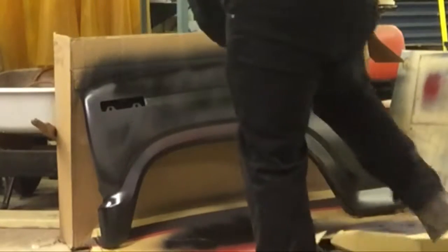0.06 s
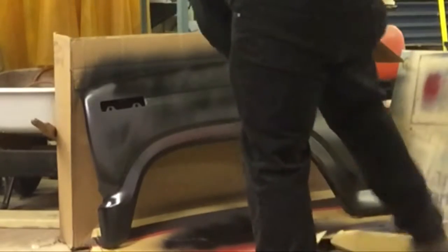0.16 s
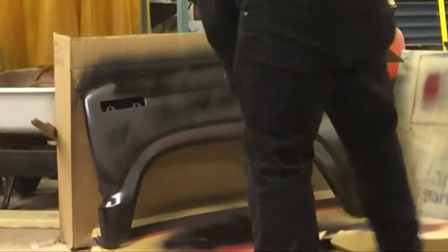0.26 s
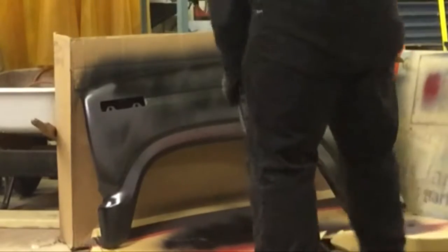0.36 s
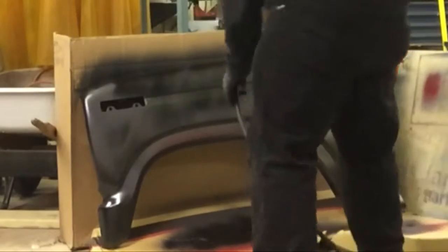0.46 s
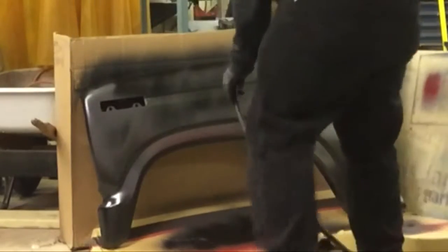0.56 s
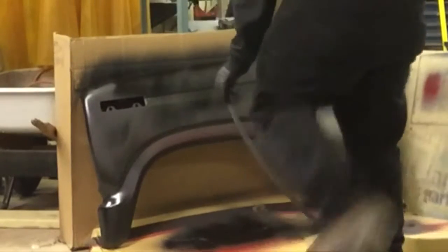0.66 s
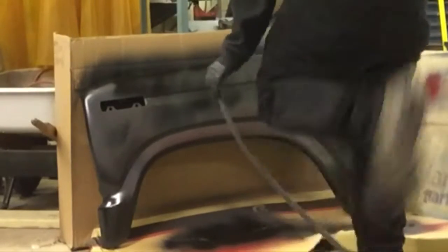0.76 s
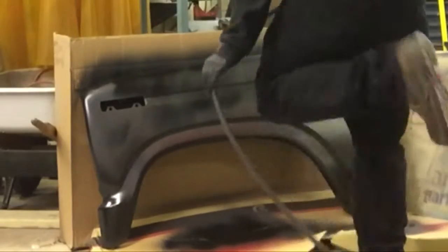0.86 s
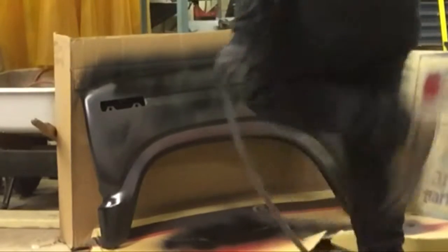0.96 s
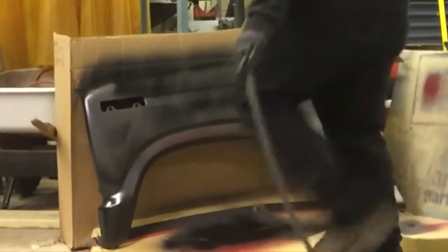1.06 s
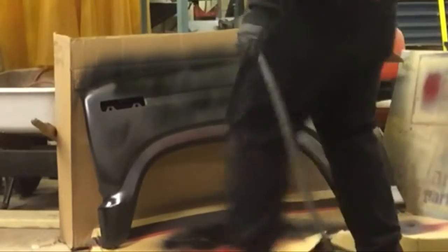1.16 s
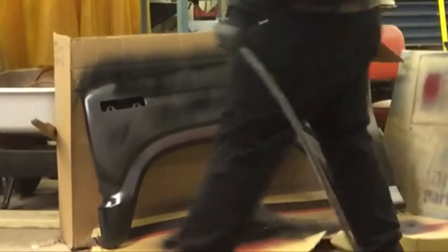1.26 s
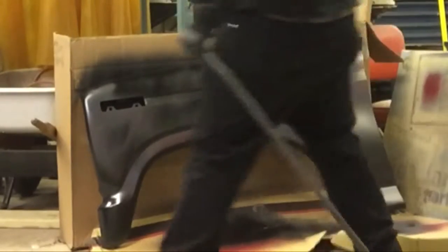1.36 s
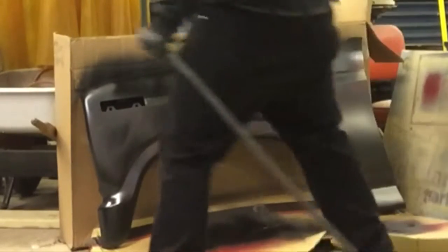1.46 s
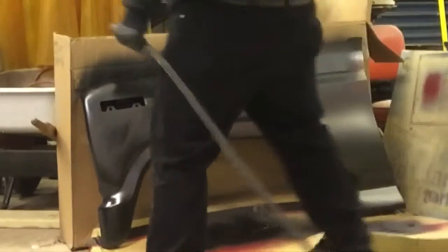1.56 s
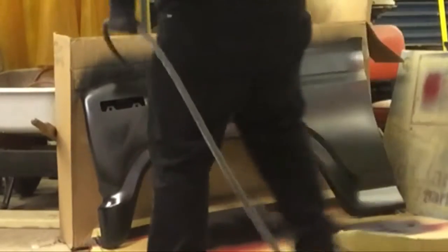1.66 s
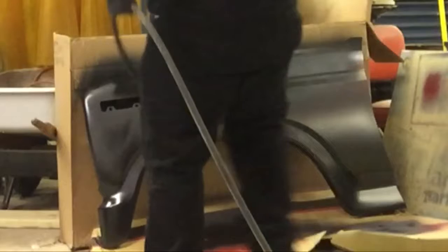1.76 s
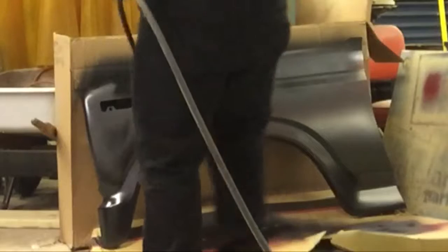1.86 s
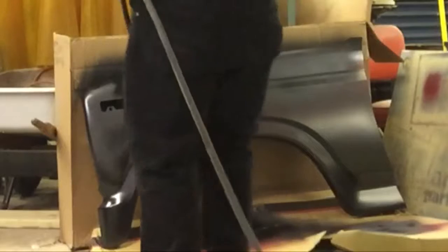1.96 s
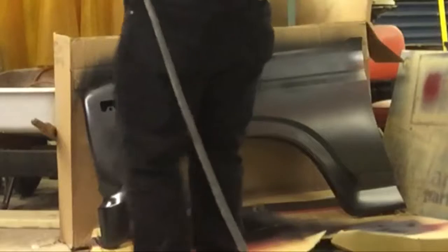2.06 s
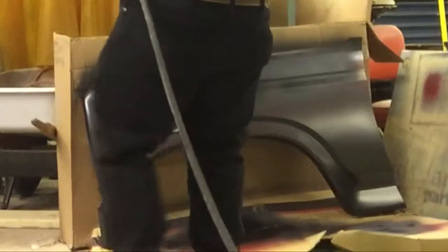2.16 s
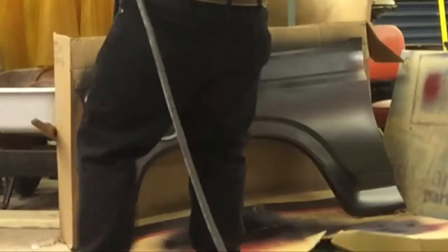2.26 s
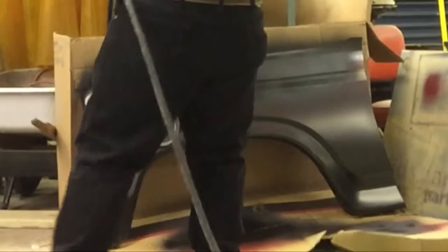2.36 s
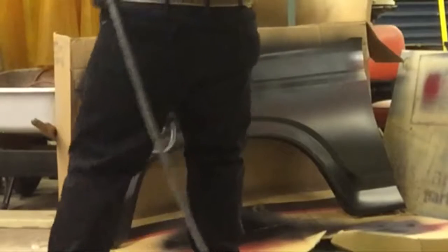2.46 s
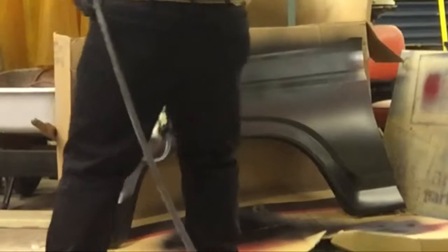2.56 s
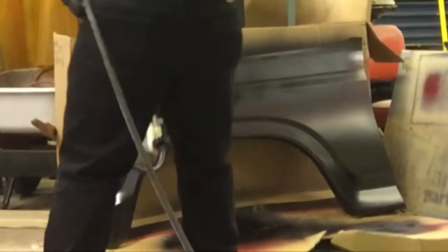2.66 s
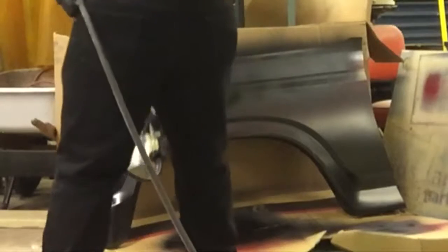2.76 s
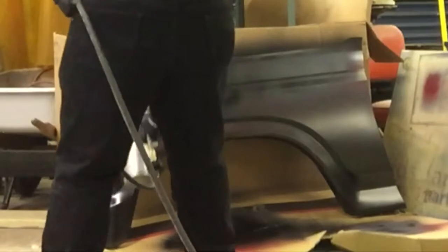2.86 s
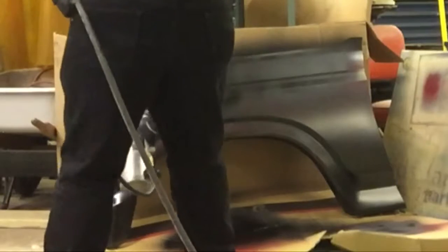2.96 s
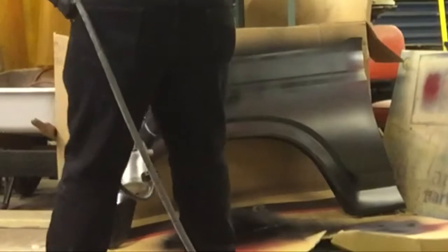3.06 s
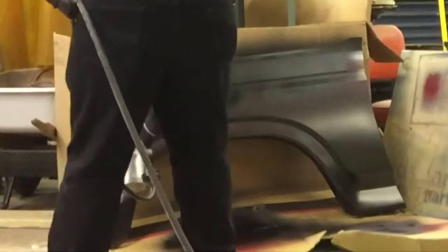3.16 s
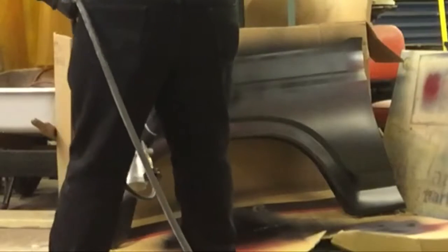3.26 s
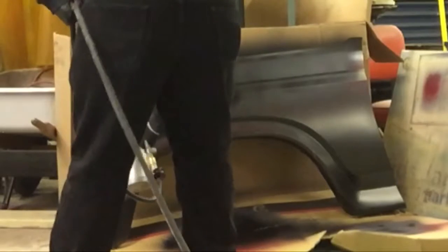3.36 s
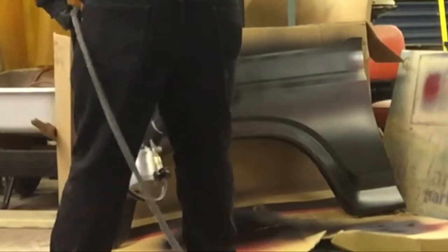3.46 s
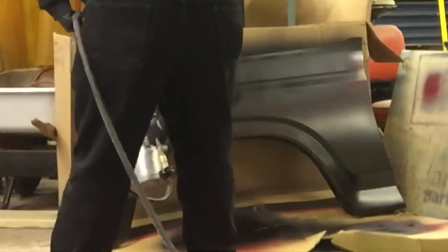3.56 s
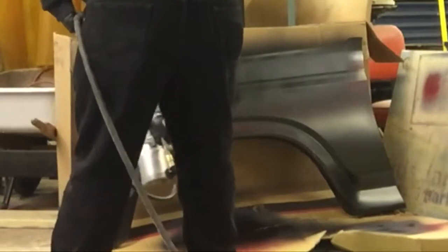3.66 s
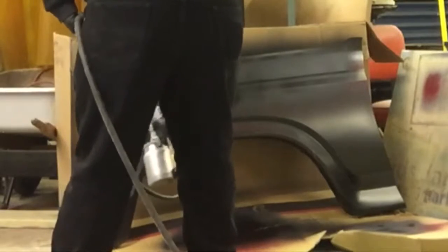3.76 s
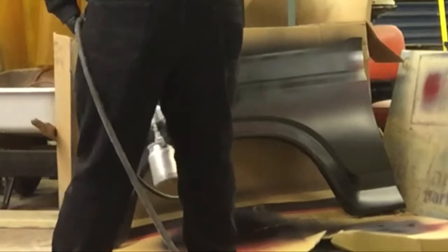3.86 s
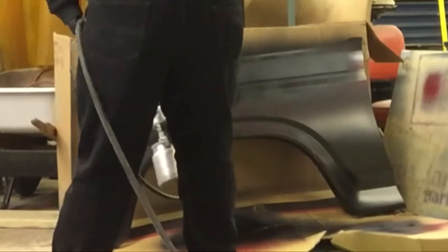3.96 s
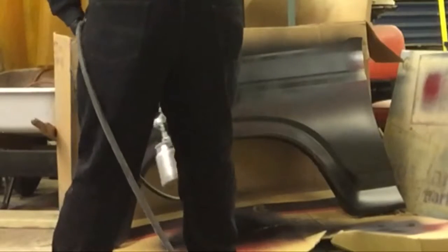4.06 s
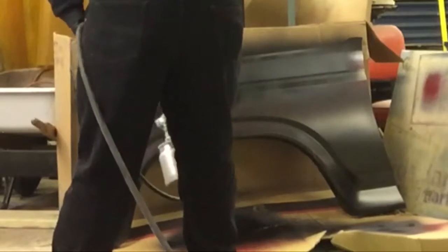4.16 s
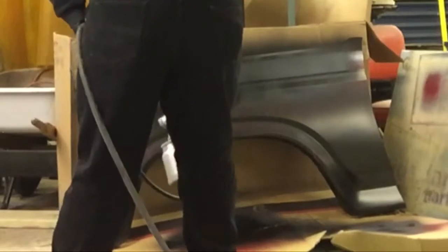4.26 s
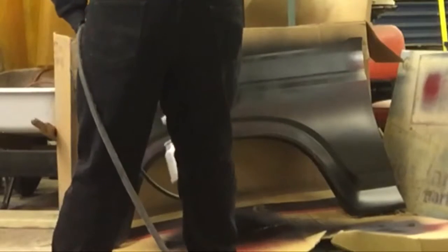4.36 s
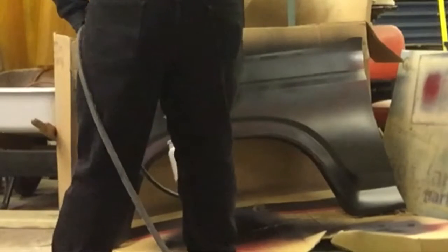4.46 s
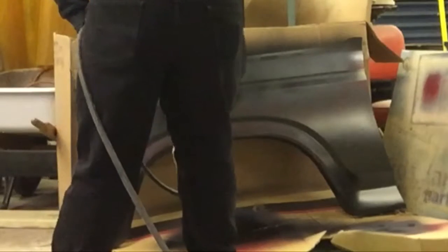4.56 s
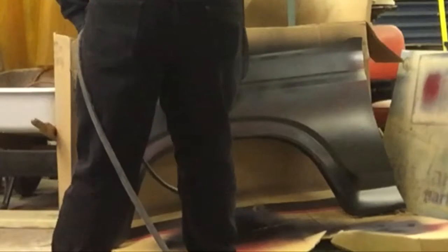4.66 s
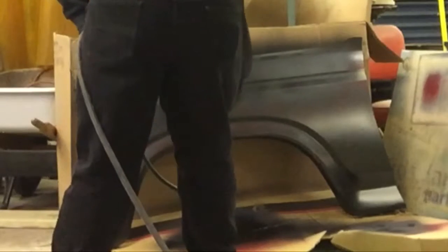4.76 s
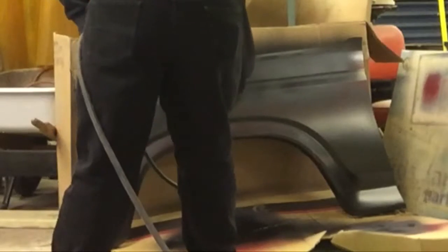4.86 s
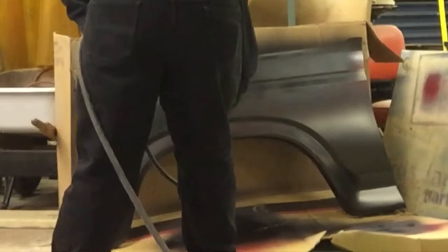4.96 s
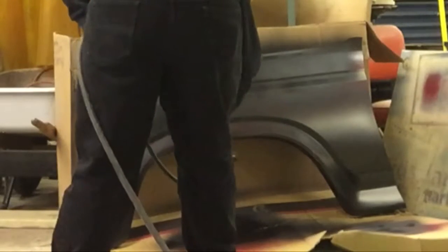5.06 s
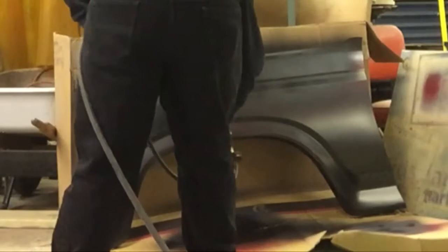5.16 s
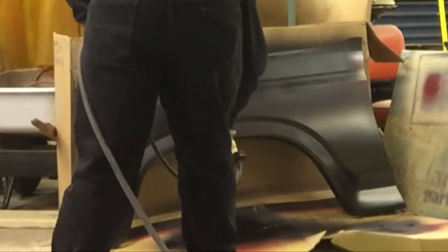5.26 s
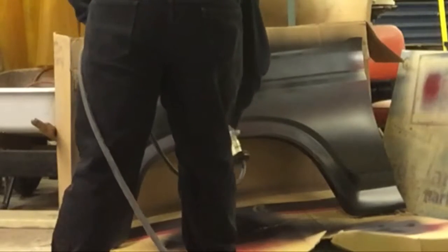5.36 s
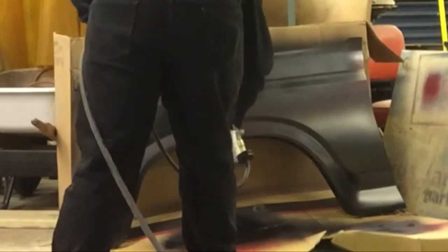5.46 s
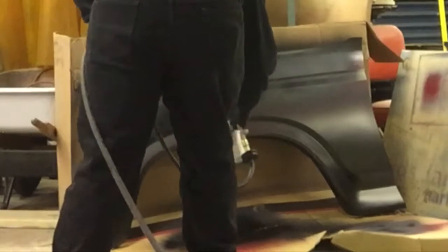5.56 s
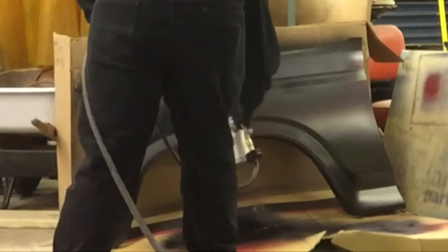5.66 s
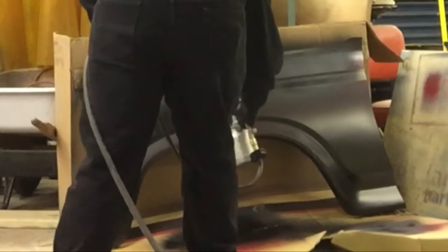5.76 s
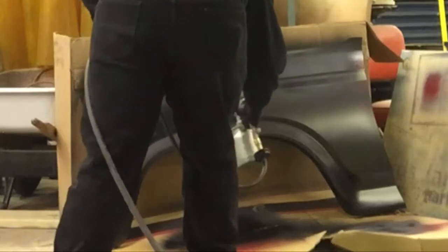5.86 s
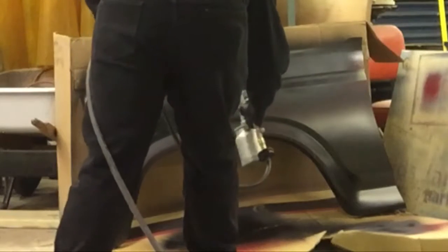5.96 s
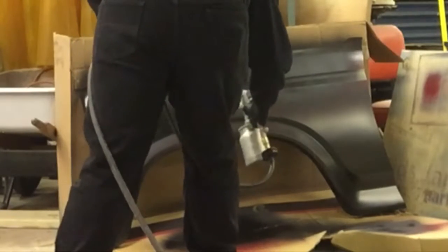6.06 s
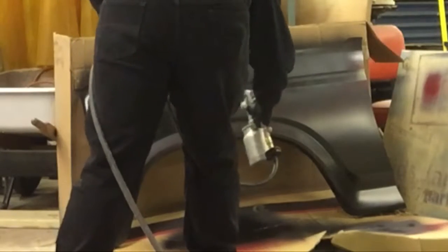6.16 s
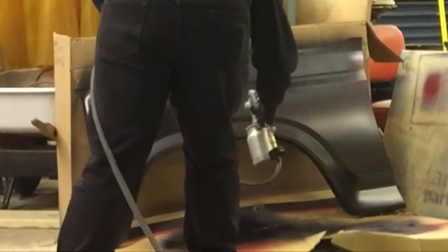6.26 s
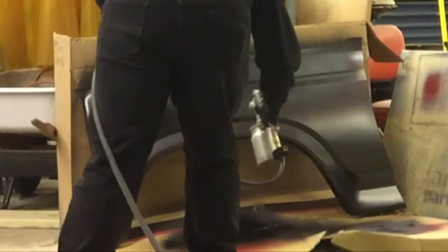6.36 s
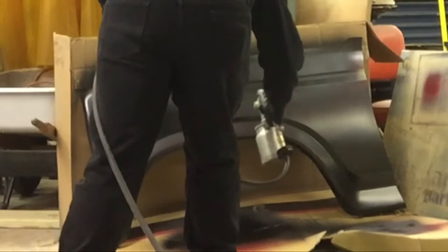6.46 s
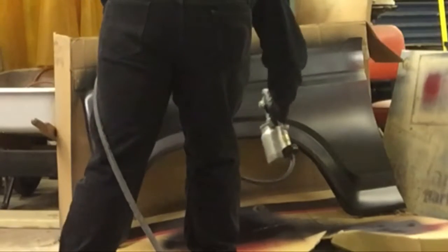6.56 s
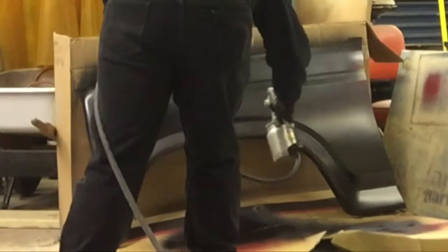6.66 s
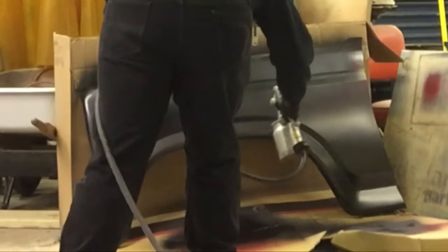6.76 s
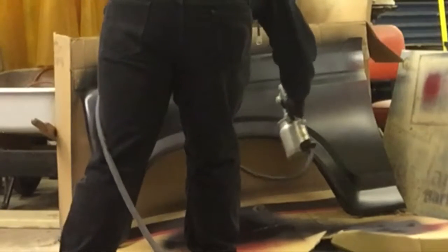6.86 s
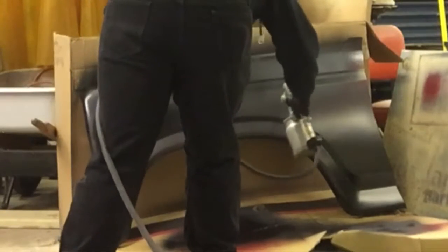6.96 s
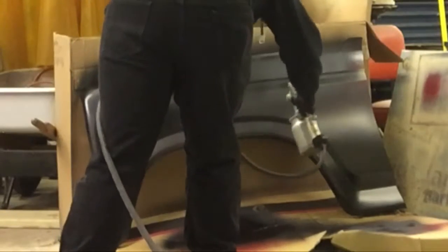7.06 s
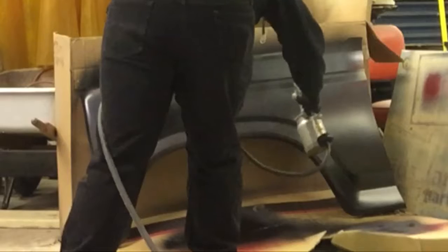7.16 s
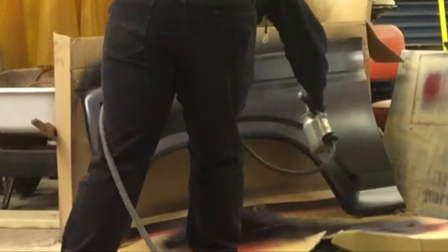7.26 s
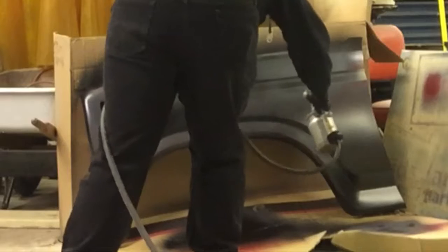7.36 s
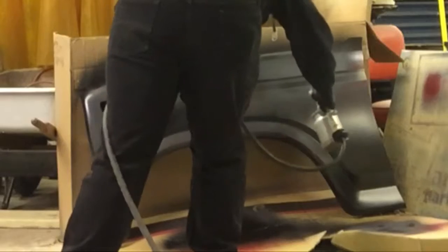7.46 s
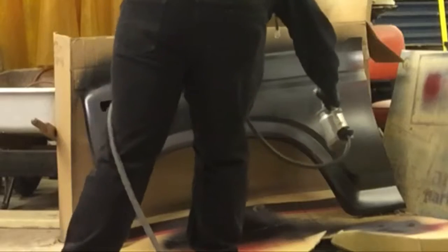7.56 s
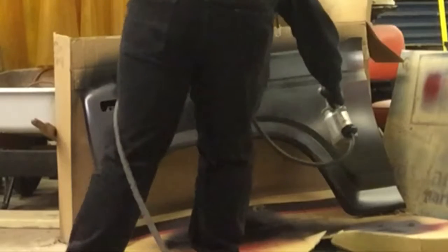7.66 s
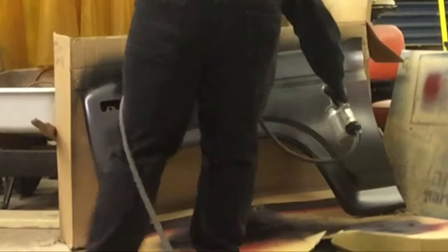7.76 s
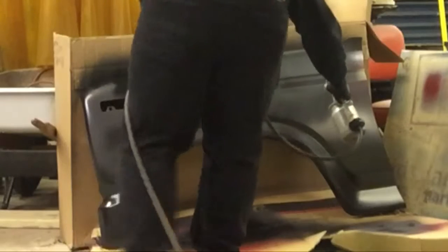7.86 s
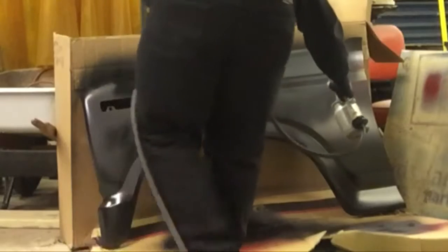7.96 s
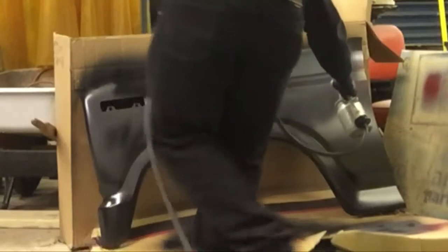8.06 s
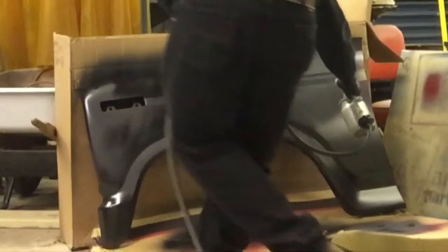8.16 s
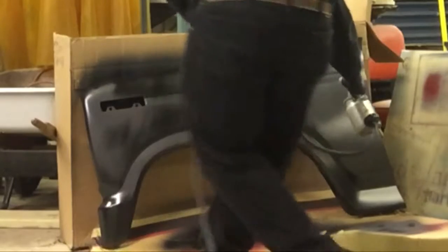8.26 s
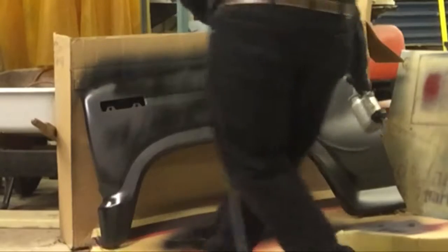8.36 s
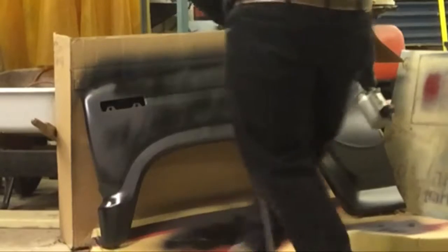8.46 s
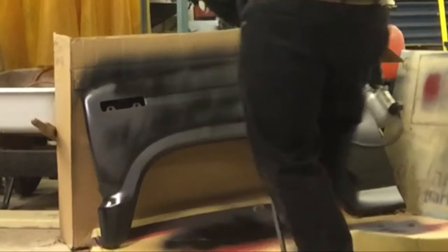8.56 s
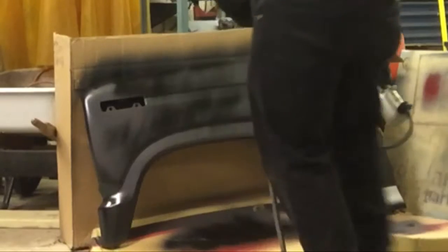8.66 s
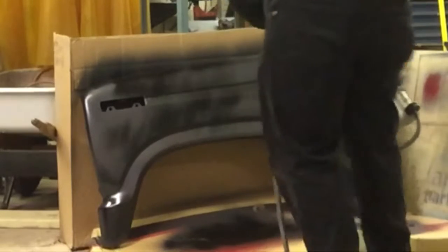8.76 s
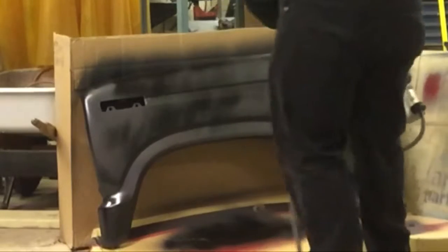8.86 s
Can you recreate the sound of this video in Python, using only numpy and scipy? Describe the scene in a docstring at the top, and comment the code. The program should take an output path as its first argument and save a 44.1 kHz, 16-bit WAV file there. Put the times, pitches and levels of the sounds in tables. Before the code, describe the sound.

Over a wavering deep motor hum, faint fabric and hose rubbing gives way to a long, sharp, continuous hiss of compressed air.

```python
"""A piston compressor thrums in a workshop, with a wavering motor hum, a low rumble and a faint air hiss.
A painter steps up to a car wing, clothes and air hose rustling, then pulls the trigger of a spray gun.
The air jet starts with a short surge and hisses on, its colour shifting as the gun sweeps along the panel.
The compressor and motor are rows of tones; the rustling, rumble and air are shaped noise.
One microphone hears it all, in mono."""
import sys
import numpy as np
from scipy import signal
from scipy.fft import rfft, irfft
from scipy.io import wavfile

SR = 44100
rng = np.random.default_rng(int(sys.argv[2]) if len(sys.argv) > 2 else 0)


def master_out(mix):
    """Clip the mix to full scale and print it as 16-bit PCM to the path in sys.argv[1]."""
    frames = np.transpose(np.atleast_2d(mix))
    ceiling = np.clip(frames, -1, 1)
    pcm = np.round(ceiling * 32767).astype(np.int16)
    wavfile.write(sys.argv[1], SR, pcm)


N = 392490  # length in samples
TIME = np.arange(N) / SR  # seconds
FREQS = np.fft.rfftfreq(N, 1 / SR)  # Hz


def undb(db):
    """Turn decibels into a gain."""
    return 10 ** (np.asarray(db) / 20)


def unit(x):
    """Scale a sound to an rms (average strength) of 1."""
    return x / np.sqrt(np.mean(x ** 2))


def curves(table):
    """Draw straight lines through each column of a time table, giving one value a sample."""
    times_s, *columns = np.transpose(table)
    return [np.interp(TIME, times_s, column) for column in columns]


def gain_at(spectrum, hz):
    """Read the gain of a (pitch_hz, level_db) table, with pitch on a logarithmic axis."""
    points_hz, level_db = np.transpose(spectrum)
    return undb(np.interp(np.log(hz + 1), np.log(points_hz), level_db))


def bumps(table):
    """Gain of a row of smooth peaks and dips, each (pitch_hz, width_hz, level_db)."""
    total_db = sum(db * np.exp(-((FREQS - hz) / width_hz) ** 2) for hz, width_hz, db in table)
    return undb(total_db)


def colour(x, gain):
    """Filter a sound with one gain for each frequency."""
    return irfft(rfft(x) * gain, N)


def noise(spectrum):
    """Make noise with the given dB per Hz at each pitch."""
    return colour(rng.standard_normal(N), gain_at(spectrum, FREQS)) * np.sqrt(SR / 2)


def walk(rate_hz):
    """Smooth random wandering with rms 1; changes faster than about rate_hz fade out."""
    return unit(colour(rng.standard_normal(N), np.exp(-(FREQS / rate_hz) ** 2)))


def room(x, t60, wet_db):
    """Add diffuse workshop reflections, which fall by 60 dB in t60 seconds."""
    t = TIME[:SR // 2]
    fade = np.exp(-np.log(1000) * t / t60)
    tail = rng.standard_normal(len(t)) * fade * (t > .006)  # reflections start after 6 ms
    tail = tail / np.linalg.norm(tail)
    return x + undb(wet_db) * signal.fftconvolve(x, tail)[:N]


def workshop(rumble_db=1, ease_db_per_s=0.18, air_db=0, waver_db=0.1, rumble_top_hz=3500,
             swell_db=2.0, swell_at_s=1.75, swell_s=0.38):
    """Low rumble that wavers, swells once, briefly, and slowly eases, under a smooth air hiss."""
    # workshop rumble before the level changes below: pitch_hz, level_db (per Hz)
    rumble_colour = [(30, -73), (39, -75), (48, -53), (66, -51.5), (88, -52.5), (100, -57.5), (150, -56),
                     (175, -54), (200, -54), (225, -61.5), (265, -63), (295, -57), (330, -64), (400, -65),
                     (490, -74), (650, -71), (1500, -80.5), (3000, -86.5)]
    # steady faint air hiss: pitch_hz, level_db (per Hz)
    air_colour = [(800, -83.5), (1650, -80), (2250, -81), (2650, -79.5), (4000, -80), (4300, -78.5),
                  (4750, -78.5), (5150, -81.3), (6400, -81), (7200, -85), (8300, -85), (11000, -89),
                  (14000, -91.5), (16000, -120)]
    # peaks and hollows that the workshop gives to the rumble: pitch_hz, width_hz, level_db
    room_modes = [(48.5, 2, 2), (53, 2, -4), (68, 2, 4), (72.6, 2.5, -2), (83, 4, 1), (96, 4, 3),
                  (159, 3.5, -2.5), (293, 14, 1), (214, 5.5, -3), (820, 110, -2.5), (955, 27, -3)]
    treble_cut = 1 / (1 + (FREQS / rumble_top_hz) ** 4)
    rumble = colour(noise(rumble_colour), bumps(room_modes) * treble_cut)
    swell = np.exp(-((TIME - swell_at_s) / swell_s) ** 2)
    level_db = rumble_db - ease_db_per_s * TIME + swell_db * swell + waver_db * walk(3.5)
    return rumble * undb(level_db) + noise(air_colour) * undb(air_db)


def motor(motor_hz=59.5, trim_db=0.0, waver_hz=0.21, waver_db=0.7, waver_rate_hz=4,
          tones_db=0, drift_hz=0.29, flicker_db=1.0):
    """A deep hum that wavers in level and pitch, with fainter tones and a thin whine above it."""
    # level of the hum before its random waver: time_s, level_db (rms)
    hum_levels = [(0, -25.5), (1.23, -24.5), (1.52, -32), (1.76, -23.5), (1.92, -31), (2.05, -25.5),
                  (2.35, -24.5), (2.43, -30), (2.6, -25.5), (2.77, -27), (2.9, -23.5), (3.9, -27),
                  (4.35, -25.5), (4.88, -28.5), (5.01, -30), (5.1, -25.5), (5.8, -25), (6.5, -29.5),
                  (6.85, -33), (7.47, -26.5), (7.65, -31.5), (8.12, -23), (8.25, -29), (8.75, -25)]
    # fainter tones and thin whine before their flicker: pitch_hz, level_db (rms)
    faint_tones = [(74.5, -46), (89.4, -40.5), (149, -47), (184.5, -48), (942.1, -57.5)]
    level_db, = curves(hum_levels)
    turns = np.cumsum(motor_hz + waver_hz * walk(4.6)) / SR
    hum = np.sin(2 * np.pi * turns) * undb(level_db + trim_db + waver_db * walk(waver_rate_hz))
    for hz, db in faint_tones:
        turns = np.cumsum(hz + drift_hz * walk(1.8)) / SR
        hum = hum + np.sin(2 * np.pi * turns) * undb(db + tones_db + flicker_db * walk(3.3))
    return np.sqrt(2) * hum  # a sine's peak is root 2 times its rms


def compressor(crank_hz=12.961, thrum_db=0, clatter_db=0, scatter_db=1.5, speed_wander=0.0008,
               size=4096, count=190):
    """Every turn of the crank repeats the same knocks, smeared by the room into a dense row of tones."""
    # strong tones: multiple of the crank rate, level_db (rms)
    strong_tones = [(6, -38), (8, -41), (10, -36), (11, -43), (12, -44), (13, -38), (15, -48), (16, -50),
                    (17, -47), (18, -52), (19, -52), (20, -51), (22, -46.5), (23, -43), (25, -57),
                    (26, -48), (27, -45), (28, -50), (29, -52), (30, -53), (31, -49), (34, -57), (36, -55),
                    (38, -59), (47, -64), (52, -58), (61, -58.5), (64, -64), (67, -57), (68, -60),
                    (69, -63), (71, -57), (72, -61.5), (86, -63), (89, -63.5), (91, -62), (104, -62)]
    # the rest of the clatter, before random scatter: pitch_hz, level_db (rms of each multiple)
    clatter_colour = [(110, -57.5), (220, -50), (350, -65), (520, -66.5), (900, -69), (1300, -67),
                      (2000, -88)]
    orders = np.arange(4, count)  # multiples of the crank rate
    tones = np.zeros(size // 2 + 1)
    scatter = undb(clatter_db + scatter_db * rng.standard_normal(len(orders)))
    tones[orders] = gain_at(clatter_colour, orders * crank_hz) * scatter
    for order, db in strong_tones:
        tones[int(round(order))] = undb(db + thrum_db)
    # the sound of one turn, its tones starting at random points of their cycles
    phases = np.exp(2j * np.pi * rng.random(len(tones)))
    one_turn = irfft(tones * phases) * size / np.sqrt(2)
    # the belt lets the speed wander a little
    turns = np.cumsum(crank_hz * (1 + speed_wander * walk(1.54))) / SR
    return np.interp(turns, np.arange(size) / size, one_turn, period=1)


def stepping(level_db=-37.5, centre_hz=112, width_hz=22, at_s=1.9, span_s=1.3):
    """A soft low rumble, a narrow band of noise, while the painter moves across the floor."""
    band_gain = np.exp(-((FREQS - centre_hz) / width_hz) ** 2)
    band = unit(colour(rng.standard_normal(N), band_gain))
    return band * undb(level_db) * np.exp(-((TIME - at_s) / span_s) ** 4)


def rubbing(trim_db=-1.0, grain_db=3, grain_hz=400, catch_db=0.5, catch_hz=90,
            slips_per_s=300, slip_db=1, slip_spread_db=3, treble_hz=10500):
    """Each stroke of cloth or hose gathers speed and dies away: a soft slide with a scrape of tiny slips."""
    # strokes as the painter steps in, before trim_db and the room:
    # start_s, rise_s, fade_s, level_db (peak), brightness_db (treble against body)
    strokes = [(.76, .19, .085, -42.5, 0), (.8, .02, .02, -49, 0), (.935, .008, .02, -47, 0),
               (.968, .008, .02, -42, 0), (1.1, 0.025, .06, -39.5, -4), (1.142, .006, .02, -43, 0),
               (1.18, .025, .035, -44, 1), (1.35, .03, .04, -46, 5), (1.435, .015, .05, -48, 4),
               (1.5, .24, .1, -52, 0), (1.715, .012, .03, -48, 0), (1.84, .025, .022, -39, 1),
               (1.901, .004, .012, -35.5, 6), (2.065, .012, .025, -49, 0), (2.12, .07, .12, -44, 0)]
    # colour of the rubbing: pitch_hz, level_db
    rub_colour = [(1500, -18), (4000, -11), (6500, -1.5), (9000, 0.5), (13000, -3.5), (16000, -22)]
    body_power, treble_power = np.zeros(N), np.zeros(N)
    for start_s, rise_s, fade_s, db, bright_db in strokes:
        since = TIME - start_s
        rise = np.clip(since / rise_s, 0, 1)
        stroke = rise * np.exp(-2 * np.maximum(since - rise_s, 0) / fade_s)
        body_power += stroke * undb(db - bright_db / 2) ** 2
        treble_power += stroke * undb(db + bright_db / 2) ** 2
    slide = unit(rng.standard_normal(N) * undb(grain_db * walk(grain_hz)))
    # separate clicks at random moments, of uneven strength
    slip_happens = rng.random(N) < slips_per_s / SR
    slips = unit(slip_happens * undb(slip_spread_db * rng.standard_normal(N)))
    contact = (slide + undb(slip_db) * slips) * undb(catch_db * walk(catch_hz))
    rustle = unit(colour(contact, gain_at(rub_colour, FREQS)))
    # body and treble follow their own levels
    body = colour(rustle, 1 / (1 + (FREQS / treble_hz) ** 8))
    treble = rustle - body
    rustle = body * np.sqrt(body_power) + treble * np.sqrt(treble_power)
    return room(rustle * undb(trim_db), t60=0.19, wet_db=-7)


def panel_gap(spread_hz=260):
    """A faint hollow band of the wash, whose pitch moves with the gap between gun and panel."""
    # hollow band, before the jet's flutter and echoes: time_s, pitch_hz, level_db (rms)
    gap_path = [(3.9, 3420, -56), (4.25, 3290, -48), (5.4, 2627, -48.5), (6.4, 2233, -48.5),
                (7.6, 2400, -53), (8.9, 2695, -54)]
    hz, level_db = curves(gap_path)
    carrier = np.cos(2 * np.pi * np.cumsum(hz) / SR)
    return unit(walk(spread_hz) * carrier) * undb(level_db)


def moving_echoes(x, echo_db, sway_s, count=8):
    """Panel, floor and painter throw back early echoes whose paths shift as the hand moves."""
    out = x
    lags_s = np.geomspace(.0011, .013, count) * rng.uniform(.85, 1.15, count)
    for lag_s in lags_s:
        heard_from = TIME - lag_s - sway_s * walk(0.573)
        out = out + undb(echo_db) * np.interp(heard_from, TIME, x)
    return out / np.sqrt(1 + count * undb(2 * echo_db))  # make up for the added power


def spray_gun(trigger_s=3.191, valve_open_s=.016, jet_db=0.87, split_hz=5200, beam_hz=10500, beaming=0.73,
              flutter_db=0.43, spit_db=0.55, wash_rise_s=.025, surge_db=2, surge_bright_db=3, surge_s=0.24,
              focus_hz=12000, focus_width_hz=1100, focus_db=0.7, turn_at_s=7.5, turn_s=.2):
    """The nozzle's fine eddies give the bright hiss; the fan of air striking the panel gives a lower wash."""
    # the jet as the gun sweeps along the panel, before jet_db, surge and flutter: time_s, level_db
    jet_levels = [(3.28, -19), (3.47, -19.5), (3.62, -17.3), (3.74, -19), (5.62, -19.5), (7.2, -18.5),
                  (7.43, -17), (7.78, -17.5), (7.95, -17.5), (8.2, -17.5), (8.45, -18.5), (8.65, -17.6),
                  (8.9, -19.5)]
    # the wash of air on the panel, swelling and sinking with the gun's aim, before flutter: time_s, level_db
    wash_levels = [(3.2, -34.5), (3.45, -33), (3.7, -31), (3.92, -32.5), (4.22, -29.5), (4.42, -30.5),
                   (5.35, -30), (5.8, -30.5), (5.95, -30), (6.25, -31), (6.42, -30.5), (6.72, -31.5),
                   (6.9, -30), (8.05, -29.5), (8.6, -30.5), (8.9, -29)]
    # colour of the air jet: pitch_hz, level_db
    jet_colour = [(500, -31), (1600, -20), (2300, -17.5), (3400, -13), (4300, -10.5), (4900, -6.5),
                  (6500, -4), (8300, -3), (9900, -3.5), (11500, 0), (13000, 1), (14400, -2), (15600, -10)]
    # ripple that the gun and its cup give to the hiss: pitch_hz, width_hz, level_db
    jet_peaks = [(2680, 90, 1), (3600, 110, 2), (5180, 70, 1), (5950, 120, -1), (6400, 90, 1.8),
                 (6980, 70, -1.5), (7120, 80, 1), (8150, 110, 2), (10600, 110, 1)]
    nozzle_db, = curves(jet_levels)
    wash_db, = curves(wash_levels)
    bass_cut = FREQS / (FREQS + 200)
    shape = gain_at(jet_colour, FREQS) * bumps(jet_peaks) * bass_cut
    # the wash takes the power below split_hz, the nozzle the power above
    low_share = 1 / (1 + (FREQS / split_hz) ** 8)
    nozzle = unit(colour(rng.standard_normal(N), shape * np.sqrt(1 - low_share)))
    wash = unit(colour(rng.standard_normal(N), shape * np.sqrt(low_share)))
    # the valve opens quickly and the hose pressure surges; the wash builds as paint and air reach the panel
    held_s = np.maximum(TIME - trigger_s, 0)
    valve = np.minimum(held_s / valve_open_s, 1)
    surge = np.exp(-held_s / surge_s)
    arrival = 1 - np.exp(-held_s / wash_rise_s)
    # the highest treble gains most from the surge and from a clear path to the microphone
    clear_db = nozzle_db - np.median(nozzle_db[held_s > 0])
    bright_db = surge_bright_db * surge + beaming * clear_db
    # tilt the hiss about beam_hz
    body = colour(nozzle, 1 / (1 + (FREQS / beam_hz) ** 8))
    treble = nozzle - body
    nozzle = body * undb(-bright_db / 2) + treble * undb(bright_db / 2)
    # as the gun turns at the far end of the panel, the jet's sharpest band stands out
    turned = .5 + .5 * np.tanh((TIME - turn_at_s) / turn_s)
    focus = colour(nozzle, np.exp(-((FREQS - focus_hz) / focus_width_hz) ** 2))
    nozzle = nozzle + focus * (undb(focus_db * turned) - 1)
    hiss = nozzle * valve * undb(nozzle_db + jet_db + surge_db * surge)
    hiss = hiss + arrival * (wash * undb(wash_db) + panel_gap())
    # the jet flutters, and paint tears off the needle in quick uneven shreds
    hiss = hiss * undb(flutter_db * walk(23) + spit_db * walk(900))
    return moving_echoes(hiss, echo_db=-20, sway_s=0.000253)


def scene():
    """All sources reach one microphone, heard alike in both channels."""
    background = workshop() + motor() + compressor()
    mono = background + stepping() + rubbing() + spray_gun()
    return np.array([mono, mono])


def record(dry, top_hz=15650):
    """The microphone housing notches the treble, and the recorder cuts everything above top_hz steeply."""
    # dips of the microphone housing: pitch_hz, width_hz, level_db
    housing_dips = [(7750, 310, -4), (10100, 130, -2.2)]
    notched = colour(dry, bumps(housing_dips))
    top_cut = signal.ellip(10, .2, 80, top_hz, fs=SR, output="sos")
    return signal.sosfilt(top_cut, notched)


dry = scene()
out = record(dry)
master_out(out)
```